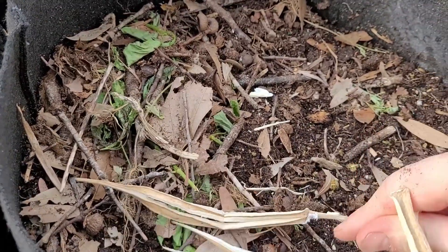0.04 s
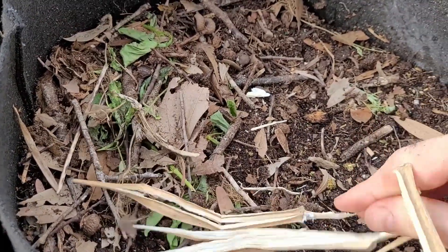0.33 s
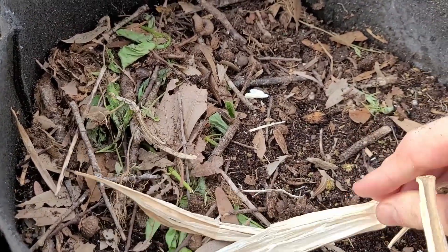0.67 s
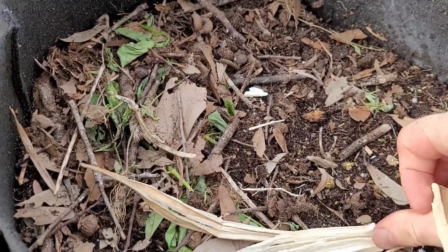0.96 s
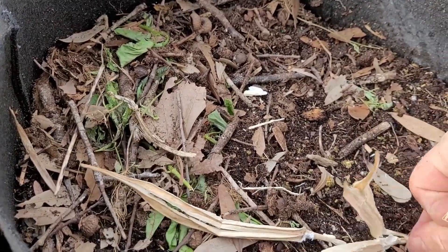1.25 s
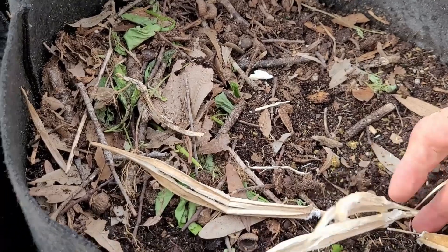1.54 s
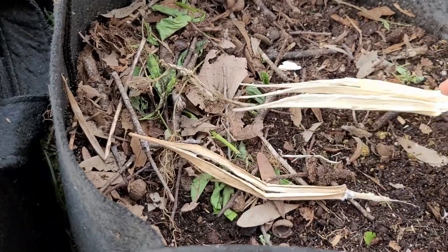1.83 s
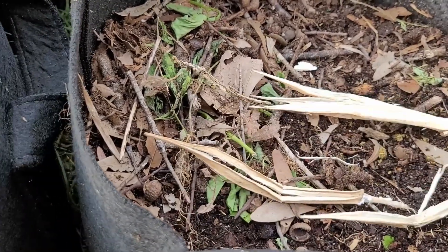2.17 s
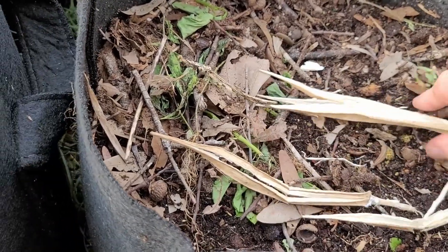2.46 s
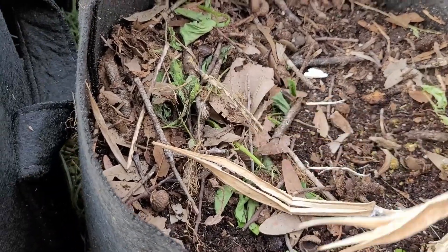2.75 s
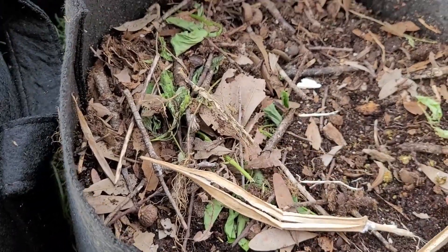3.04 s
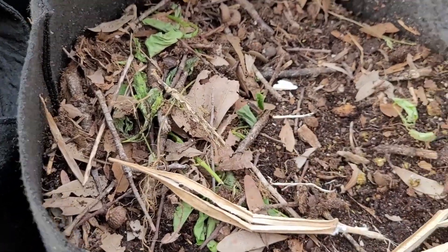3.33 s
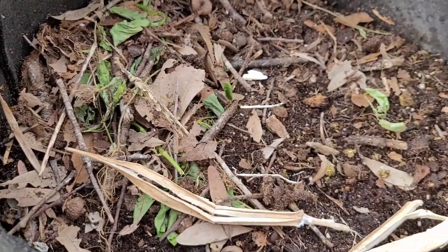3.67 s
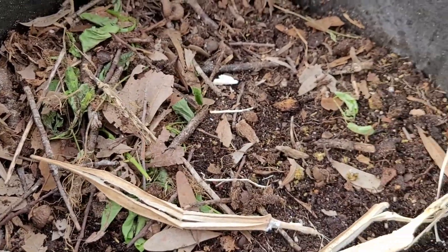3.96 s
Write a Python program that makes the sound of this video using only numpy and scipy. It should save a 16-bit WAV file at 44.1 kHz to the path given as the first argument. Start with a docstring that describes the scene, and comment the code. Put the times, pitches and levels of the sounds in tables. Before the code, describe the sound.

Dry seed pods snap and rustle as a hand pulls them apart close to the microphone, loudest at the start. Later they scrape and tap on leaf litter. Outdoors, a low distant rumble and a faint pulsing insect continue.

```python
"""Outdoors, over a fabric planter, a hand pulls dry seed pods apart close by. The husks snap as they tear
and rustle against each other. Off to the right, pods scrape over the leaf litter while the planter
thuds, pod tips rasp, twigs tap, and a sliding pod squeaks once near the end. Behind it all are a low
distant rumble, a soft hiss of air and a high, faint insect pulsing about five times a second."""
import sys
import numpy as np
from scipy import signal
from scipy.fft import rfft, irfft, next_fast_len
from scipy.io import wavfile
from scipy.ndimage import uniform_filter1d, map_coordinates

SR = 44100
rng = np.random.default_rng(int(sys.argv[2]) if len(sys.argv) > 2 else 0)


def wav_record(signal):
    """Record a signal, one row per channel, as 16-bit PCM in the file named by sys.argv[1]."""
    frames = np.transpose(np.atleast_2d(signal))
    bounded = np.clip(frames, -1, 1)
    # unit amplitude maps onto the largest positive 16-bit level
    quanta = np.round(bounded * 32767).astype(np.int16)
    wavfile.write(sys.argv[1], SR, quanta)


N = 176400  # 4 seconds

# slow swell of the distant rumble: time_s, level_db
RUMBLE_SWELL = [(.2, -51), (.29, -48), (.85, -50), (1.3, -47), (1.8, -49), (2.799, -48), (3.22, -51),
                (3.6, -50)]
# wavering tones in the rumble: pitch_hz, level_db
HUM_TONES = [(58, -63), (138, -55)]
# insect chirps: peak_s
CHIRP_TIMES = [.105, .3, .49, .69, .9, 1.09, 1.29, 1.49, 1.7, 1.905, 2.085, 2.285, 2.52, 2.767, 2.97, 3.199,
               3.39, 3.58, 3.79, 3.971]
# husks snapping: start_s, level_db, tear_ms, body_over_treble_db
HUSK_SNAPS = [(.0003, -13.5, 4.6, -11.5), (0.0314, -22, 2.1, -33), (0.036, -23.5, 4.1, -8),
              (0.163, -41.5, 5.1, -7.5), (0.197, -38, 5.9, -7.5), (0.281, -24, 0.6, -34),
              (.311, -32, 1.8, -16), (.382, -35, 0.51, -11), (0.394, -23, 1.07, -10.5),
              (0.3997, -35, 1, -9), (0.971, -42.5, 1.4, -12), (1.017, -33, 2.7, -12.5),
              (1.09, -39, .9, -12.5), (1.126, -36.5, 3.1, -18), (1.206, -34, 2, -15),
              (1.23, -40.5, 1.4, -3), (1.25, -33, 1.1, -16), (1.3181, -25, 1.35, -38),
              (1.513, -42.5, 1.0, 0), (1.5326, -38.5, 0.55, -10), (1.7101, -20.5, 1.2, -9),
              (1.719, -44, 4.8, 2.5), (1.7463, -33, 5.3, -8), (1.984, -42, 0.79, -13),
              (2.053, -39.5, 0.61, -7.5), (2.153, -39, 0.77, -8), (2.182, -39, .7, -21),
              (2.509, -38, 2, -26), (2.558, -31, 1.1, -16), (2.593, -34.5, 1.8, -4), (2.605, -31, 3, -2.5),
              (2.651, -50, 2.9, 0), (2.695, -46, 1.5, 3.5), (2.796, -40, 4.6, -11.5),
              (2.868, -34, 1.55, -29), (3.66, -38.5, 4.5, -2), (3.6908, -38.5, 1.65, 1.5),
              (3.968, -51, 2.6, 9)]
# husk rubbing on husk: peak_s, half_length_s, level_db
HUSK_RUBS = [(.018, 0.045, -40.5), (.2, 0.1, -55.5), (.31, 0.021, -42.5), (.36, 0.014, -43.5),
             (.41, 0.031, -48), (.573, 0.007, -51.5), (.53, 0.1, -62.5), (.82, 0.085, -60),
             (1.02, 0.074, -54), (1.202, 0.016, -40), (1.26, 0.015, -51.5), (1.377, 0.021, -55.5),
             (1.32, 0.2, -59), (1.64, 0.042, -56.5), (1.74, 0.051, -55.5), (1.9, 0.057, -59),
             (2.005, 0.046, -54), (2.18, 0.043, -60.5), (2.52, 0.055, -60), (2.565, 0.012, -43),
             (2.605, 0.022, -38.5), (2.83, 0.057, -60.5), (2.878, 0.03, -52.5), (3.03, 0.078, -58)]
# where the hand holds the pods: time_s, left_over_right_db
HAND_PLACE = [(0, 0.5), (.39, 1), (1.02, 2), (1.32, 0.5), (2.9, 0.5), (3.6, -10.5)]
# pods dragged over the litter: peak_s, half_length_s, level_db, thud_over_scrape_db
POD_SCRAPES = [(.01, 0.0089, -40, -6), (0.041, 0.019, -48.5, 5), (2.616, 0.053, -50, -2),
               (3.623, 0.011, -40.5, -7), (3.641, 0.069, -46.5, 0)]
# notes at which a hollow pod rings: pitch_hz, width_hz, level_db
POD_NOTES = [(840, 60, 6), (1490, 70, -7.5), (1900, 90, 2), (3850, 160, -1.5)]
# a pod's tip rasping along: peak_s, half_length_s, level_db
TIP_RASPS = [(.487, .004, -52), (1.574, 0.0064, -43), (1.615, 0.034, -46), (1.645, 0.027, -45.5)]
# twigs and pod tips tapping: start_s, pitch_hz, level_db
TWIG_TAPS = [(2.728, 1130, -35.5), (3.621, 3900, -36.5), (3.628, 1950, -37), (3.676, 3600, -43)]

# tone colours, or how strong each sound is from low to high: frequency_hz, level_db
RUMBLE_COLOUR = [(20, -28.5), (40, -13), (57, 2), (75, -7.5), (120, -1.5), (165, -11), (240, -12),
                 (340, -16.5), (450, -28), (1500, -80.5)]  # distant rumble
AIR_COLOUR = [(100, 6.5), (550, -5), (850, 0.5), (1350, 1), (2000, -6), (2550, -12.5), (3100, -2.5),
              (3800, -17.5), (5000, -17.5), (6800, -11), (9000, -21.5), (16000, -23)]  # hiss of the air
BUZZ_COLOUR = [(6000, -55), (6900, -21), (7300, -4), (7620, 1.5), (7800, -11.5), (8200, -20), (9000, -38.5)]  # insect buzz
CRISP_COLOUR = [(500, -28.5), (2000, -23), (4000, -15.5), (6500, -15), (8500, -2), (12000, 3), (16000, 3.5)]  # a husk's crisp treble
WOODY_COLOUR = [(150, -5.5), (400, -9), (800, -1), (1400, -2), (2300, 1.5), (3500, 0), (5000, 0.5),
                (8000, 2), (11000, -27.5)]  # a husk's woody body
ZING_COLOUR = [(7000, -24.5), (9600, -37), (11000, 1), (12750, 7.5), (14300, 5.5), (16000, -48)]  # very high ring of a hard snap
LITTER_COLOUR = [(300, -14.5), (1100, 0), (1900, -3), (2600, 1), (3800, -3.5), (5000, -7), (15000, -11)]  # crunch of leaf litter
THUD_COLOUR = [(90, -28.5), (250, 5), (400, -8.5), (520, -15.5), (800, -7.5), (3000, -47)]  # hollow thud of the planter
RASP_COLOUR = [(500, -12.5), (1100, 5.5), (1500, 5.5), (2200, -2), (3100, 0.5), (4500, -14.5), (16000, -13)]  # a rasping pod tip

FADE_S = 0.00091  # how fast a tiny click dies away
JUDDER_HZ = 266  # slips a second of a dragged pod
POD_WIDTH = 0.5  # stereo width: 0 is a point, 1 is wide


def amp(db):
    """Turn decibels into a gain."""
    return 10 ** (np.asarray(db) / 20)


def unit(x):
    """Scale a signal to an average power of 1."""
    return x / np.sqrt(np.mean(x ** 2) + 1e-20)


def colour_gain(colour, hz):
    """Read a tone colour's gain at these frequencies."""
    points_hz, level_db = np.transpose(colour)
    return amp(np.interp(np.log(hz + 1), np.log(points_hz + 1), level_db))


def wobble(rate, size=N):
    """A smooth random curve with `rate` new values every SR points (one second of sound)."""
    values = rng.standard_normal(int(size * rate / SR) + 4)
    return map_coordinates(values, [np.arange(size) * rate / SR])


def filtered(x, response):
    """Scale each frequency in x by response(hz)."""
    size = next_fast_len(N + SR // 4)
    return irfft(rfft(x, size) * response(np.fft.rfftfreq(size, 1 / SR)), size)[..., :N]


def coloured(x, colour):
    """Give x a tone colour, at a power of 1."""
    return unit(filtered(x, lambda hz: colour_gain(colour, hz)))


def white_noise(width, size=N):
    """Plain stereo hiss: the wider it is, the less alike left and right are."""
    middle, side = rng.standard_normal((2, size))
    return np.array([middle + width * side, middle - width * side]) / np.hypot(1, width)


def noise(colour, width):
    """Stereo noise with a tone colour."""
    return coloured(white_noise(width), colour)


def swells(rows):
    """A loudness curve of bell-shaped swells, from rows of peak_s, half_length_s, level_db."""
    t = np.arange(N) / SR
    power = sum(amp(db) ** 2 * np.exp(-np.minimum(2 * ((t - peak_s) / half_s) ** 2, 60))
                for peak_s, half_s, db in rows)
    return np.sqrt(power)


def causal(gain):
    """A filter with these gains that rings only after a hit, never before (minimum phase)."""
    cepstrum = irfft(np.log(np.maximum(gain, 1e-6)))
    half = cepstrum.shape[-1] // 2
    cepstrum[..., 1:half] *= 2
    cepstrum[..., half + 1:] = 0
    return np.exp(rfft(cepstrum))


def panned(pair, db):
    """Turn the left side up against the right by db."""
    return pair * amp(db * np.array([[1], [-1]]) / 2)


def rumble_and_air(air_db=-60.5):
    """A distant rumble and its wavering hum swell slowly under a soft hiss of air."""
    level_db = np.interp(np.arange(N) / SR, *np.transpose(RUMBLE_SWELL))
    hum = np.zeros(N)
    for hz, db in HUM_TONES:
        loudness = amp(db + level_db - level_db.mean() + 2.7 * wobble(rate=6.9))
        hum += loudness * np.sin(2 * np.pi * np.cumsum(hz + 2 * wobble(rate=12)) / SR)
    rumble = amp(level_db) * noise(RUMBLE_COLOUR, width=0.27)
    return rumble + hum + amp(air_db) * noise(AIR_COLOUR, width=1)


def insect(pitch_hz=7640, chirp_db=-62.5, chorus_db=-67):
    """An insect's thin tone and buzz pulse together over a faint, steady chorus."""
    pulses = swells([(peak_s, 0.044, chirp_db) for peak_s in CHIRP_TIMES])
    flutter = amp(2.9 * wobble(rate=130))
    tone = unit(np.sin(2 * np.pi * np.cumsum(pitch_hz + 14 * wobble(rate=130)) / SR))
    buzz = noise(BUZZ_COLOUR, width=0.49)
    return pulses * flutter * (tone + buzz) + amp(chorus_db) * noise(BUZZ_COLOUR, width=0.94)


def husk_snaps(tail_s=0.0077, tail_db=-12, ring_db=3, size=4096):
    """Each snap is a brief tear that rings in its own way, then scatters off the litter."""
    out, t, hz = np.zeros((2, N + size)), np.arange(size) / SR, np.fft.rfftfreq(size, 1 / SR)
    crisp, woody, zing = (unit(colour_gain(c, hz)) for c in (CRISP_COLOUR, WOODY_COLOUR, ZING_COLOUR))
    for start_s, db, tear_ms, body_db in HUSK_SNAPS:
        tear_s = tear_ms / 1000
        rise, after_s = np.minimum(2 * t / tear_s, 1), np.maximum(t - tear_s, 0)
        shape = rise * np.exp(-after_s / FADE_S)
        tear = unit(white_noise(POD_WIDTH, size) * shape) * np.sqrt(np.mean(shape ** 2))
        scatter = rng.standard_normal((2, size)) * rise * amp(tail_db) * np.exp(-after_s / tail_s)
        treble = unit(np.hypot(crisp, amp(31.5 + 3 * db) * zing))  # harder snaps have more zing
        ring = unit(amp(ring_db * wobble(rate=1100, size=len(hz))))
        colour = causal(np.hypot(treble, amp(body_db) * woody) * ring)
        lag_s = 0.00011 * rng.standard_normal()  # one side hears the snap slightly later
        delay = np.exp(-1j * np.pi * hz * lag_s * np.array([[1], [-1]]))
        snap = irfft(rfft(tear + scatter) * colour * delay) * (t < t[-1] / 2)
        start = round(start_s * SR)
        out[:, start:start + size] += amp(db) * snap
    return out[:, :N]


def fibre_ticks(per_second=900, pitch_hz=12320, fade_cycles=1.4, size=96):
    """Dry fibres tick, most faintly and a few strongly, each with its own pitch and place."""
    count, t = int(per_second * N / SR), np.arange(size) / SR
    starts = rng.integers(0, N, (count, 1))
    detune, *phases = np.clip(rng.standard_normal((3, count, 1)), -2, 2)
    strength_db = 3.1 * np.minimum(rng.exponential(size=(count, 1)), 4.5)
    hz = pitch_hz * 2 ** (0.23 * detune)
    shape = amp(strength_db) * np.exp(-t * hz / fade_cycles) * (1 - np.exp(-t * hz))
    sides = [shape * np.sin(2 * np.pi * hz * t + phase) for phase in phases]
    where = (starts + np.arange(size)).ravel()
    return unit(np.array([np.bincount(where, side.ravel(), N + size)[:N] for side in sides]))


def wandering_contact(pair, depth_db=2.2):
    """The point of contact wanders, so brief ringing notes come and go."""
    bands = signal.stft(pair, nperseg=256)[2]
    patches = uniform_filter1d(rng.standard_normal(bands.shape[1:]), 3, axis=0)  # blur over pitch
    patches = uniform_filter1d(patches, 6, axis=1)  # blur over time
    return unit(signal.istft(bands * amp(depth_db * unit(patches)), nperseg=256)[1][:, :N])


def friction(width, slips_per_s=700, scatter_db=5.5, hiss_share=0.6):
    """Fibres catch and slip, making tiny clicks of random size over a smooth hiss."""
    slipping = rng.random(N) < slips_per_s / SR
    slips = slipping * amp(scatter_db * np.clip(rng.standard_normal(N), -2, 2))
    power = signal.lfilter([1], [1, -np.exp(-2 / (FADE_S * SR))], slips ** 2)
    return white_noise(width) * np.sqrt(hiss_share + (1 - hiss_share) * power / power.mean())


def husk_rubs(hiss_db=-1, body_db=-6, flutter_db=1.4):
    """Husk catches unevenly on husk: a papery rustle of ticks, hiss and a little woody body."""
    crackle = fibre_ticks() + amp(hiss_db) * wandering_contact(noise(CRISP_COLOUR, width=1))
    grip = unit(amp(flutter_db * wobble(rate=160)))
    body = amp(body_db) * coloured(friction(width=0.93), WOODY_COLOUR)
    return swells(HUSK_RUBS) * grip * (crackle + body)


def hollow_pod(hz):
    """A hollow pod's response: it rings at a few notes and weakens the rest."""
    return sum(amp(db) * 1j * hz * width_hz / (pitch_hz ** 2 - hz ** 2 + 1j * hz * width_hz)
               for pitch_hz, width_hz, db in POD_NOTES)


def pod_scrapes(ring_db=-8):
    """Pods drag over the litter with a dull crunch; the pod rings and the planter thuds."""
    slips = wandering_contact(friction(POD_WIDTH))
    ring = amp(ring_db) * unit(filtered(slips, hollow_pod))
    crunch = swells([row[:3] for row in POD_SCRAPES]) * (coloured(slips, LITTER_COLOUR) + ring)
    thuds = swells([(peak_s, half_s, db + thud_db) for peak_s, half_s, db, thud_db in POD_SCRAPES])
    return crunch + thuds * noise(THUD_COLOUR, POD_WIDTH)


def tip_rasps():
    """A pod's tip judders along in a quick, uneven run of slips."""
    slip_hz = JUDDER_HZ * np.exp(0.3 * wobble(JUDDER_HZ))
    cycle = np.cumsum(slip_hz / SR) % 1
    slips = np.exp(-2 * cycle) * white_noise(POD_WIDTH)
    return swells(TIP_RASPS) * coloured(slips, RASP_COLOUR)


def twig_taps(ring_s=0.018):
    """Twigs and pod tips knock lightly, each ringing briefly at one pitch."""
    out, t = np.zeros(N + SR), np.arange(SR // 10) / SR
    rise = 1 - np.exp(-t / FADE_S)
    for start_s, hz, db in TWIG_TAPS:
        tap = rise * amp(db - 60 * t / ring_s) * np.sin(2 * np.pi * hz * t)
        out[round(start_s * SR):][:len(t)] += tap
    return out[:N]


def pod_squeak(peak_s=3.595, half_length_s=0.021, level_db=-55.5, pitch_hz=1840):
    """The pod squeaks roughly as it starts to slide."""
    tone = np.sin(2 * np.pi * np.cumsum(pitch_hz + 45 * wobble(JUDDER_HZ)) / SR)
    roughness = amp(2 * wobble(JUDDER_HZ))
    return swells([(peak_s, half_length_s, level_db)]) * unit(tone * roughness)


def scene(move_s=0.49, lag_s=0.00054):
    """Mix the husks in the hand, the pods on the litter to the right, the insect and the rumble."""
    t = np.arange(N) / SR
    hand = panned(husk_snaps() + husk_rubs(), np.interp(t, *np.transpose(HAND_PLACE)))
    left, right = pod_scrapes() + tip_rasps() + twig_taps() + pod_squeak()
    left_delay_s = lag_s * np.minimum(t / move_s, 1)  # grows as the pods move to the right
    left = map_coordinates(left, [np.arange(N) - left_delay_s * SR])
    litter = panned(np.array([left, right]), db=-2.5)
    return hand + litter + insect() + rumble_and_air()


def record(dry, top_hz=15880):
    """Cut away the very highest treble, above top_hz."""
    return filtered(dry, lambda hz: 1 / np.sqrt(1 + (hz / top_hz) ** 400))


dry = scene()
out = record(dry)
wav_record(out)
```